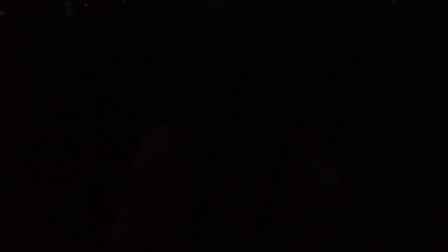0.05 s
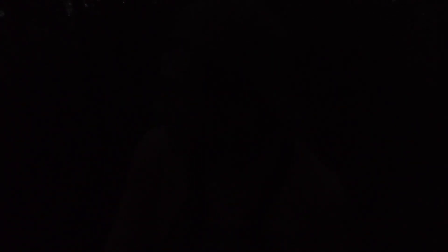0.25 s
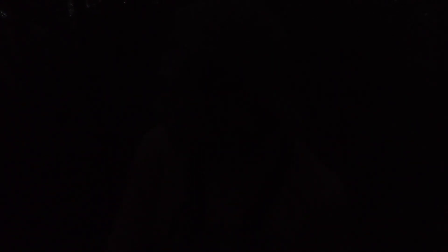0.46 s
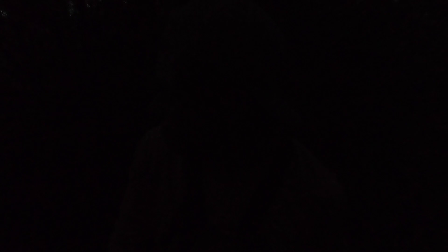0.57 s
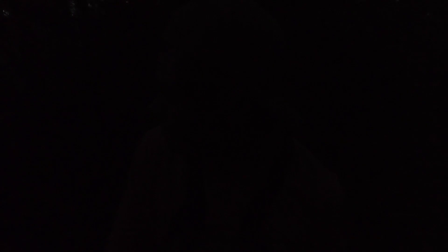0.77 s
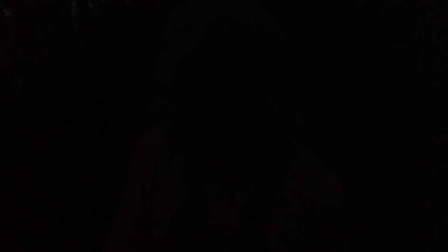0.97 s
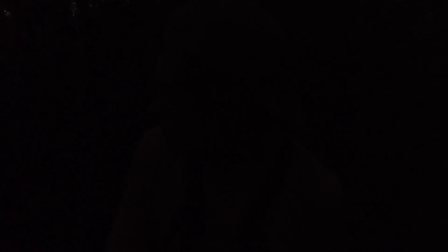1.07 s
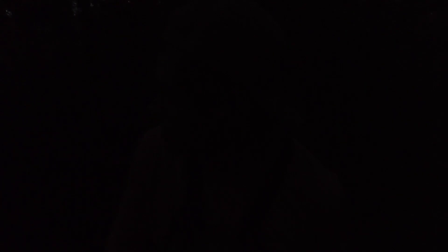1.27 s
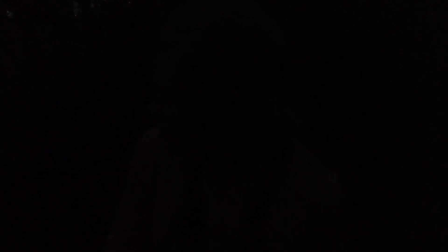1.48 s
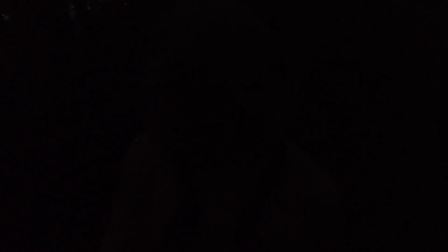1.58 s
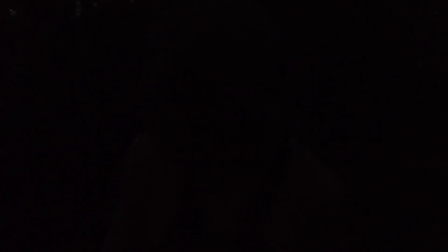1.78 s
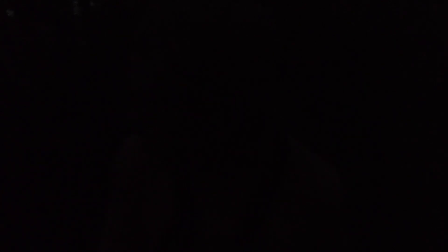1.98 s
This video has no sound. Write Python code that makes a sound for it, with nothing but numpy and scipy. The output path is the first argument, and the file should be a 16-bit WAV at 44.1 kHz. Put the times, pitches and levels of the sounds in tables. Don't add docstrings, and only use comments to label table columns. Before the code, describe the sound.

Night crickets: soft pulsing low chirps, a constant shimmering high chorus, faint rumble and small bumps

```python
import sys
import numpy as np
from scipy import signal
from scipy.fft import rfft, irfft, next_fast_len
from scipy.io import wavfile
from scipy.ndimage import uniform_filter1d

SR = 44100
rng = np.random.default_rng(int(sys.argv[2]) if len(sys.argv) > 2 else 0)


def elevation(decibels):
    levels = np.asarray(decibels, float)
    return 10 ** (levels / 20)


def log_audio(samples):
    frames = np.atleast_2d(samples).T
    limited = np.clip(frames, -1, 1)
    pcm = np.round(limited * 32767).astype(np.int16)
    wavfile.write(sys.argv[1], SR, pcm)


N = 89831

# (first stroke [s], level [dB], length [strokes])
NEAR_CHIRPS = [
    (.068, -44.5, 11.8),
    (.411, -42, 9.7),
    (.731, -43, 10.8),
    (1.055, -40, 9.8),
    (1.389, -41.5, 10.4),
    (1.737, -43, 12),
]
# (first stroke [s], level [dB], length [strokes], pitch [Hz])
NEIGHBOUR_CHIRPS = [(0.014, -44.5, 11.7, 1810), (.14, -48, 12, 1743), (.335, -44, 8.3, 1785),
                    (0.435, -46, 3.7, 1763), (0.507, -46.5, 8.4, 1818), (.63, -51.5, 7.7, 1799),
                    (.703, -44.5, 6.5, 1760), (0.86, -46.5, 8.7, 1822), (0.988, -51.5, 5.7, 1804),
                    (1.128, -44, 8.9, 1803), (1.241, -48.5, 11.2, 1836), (1.423, -45.5, 6.4, 1776),
                    (1.509, -42.5, 7.6, 1808), (1.603, -48.5, 7.6, 1821), (1.726, -49, 13.7, 1713),
                    (1.872, -43, 9.7, 1838), (1.958, -47.5, 5.2, 1770), (.123, -39, 1.5, 1832),
                    (.182, -42.5, 1.5, 1854), (.445, -43, 1.5, 1880), (0.7968, -42.5, 3.5, 1865),
                    (.788, -45, 1.5, 1862), (1.886, -45, 1.5, 1870), (1.09, -47.5, 2.5, 1888),
                    (1.179, -41, 1.9, 1835), (1.82, -44, 3.5, 1873), (1.934, -41, 1.5, 1856),
                    (1.483, -41, 1.9, 1855)]
# (pitch [Hz], level against main tone [dB], share of stroke [0-1], early [s])
WING_TONES = [
    (2896, -36, 0.8, .001),
    (1573, -15.5, 0.484, -.002),
    (3400, -38, 0.26, -0.0048),
]
# (pitch [Hz], level [dB], left lag [s], pitch arch in a stroke [share])
TRILL_VOICES = [
    (8215, -77.5, .000105, 0.027),
    (7790, -62, -0.0019, 0.018),
    (5275, -69, .00005, 0.0098),
    (5550, -75.5, .00002, .012),
    (7450, -75.5, -.00002, 0.017),
    (6210, -66.5, .00004, .02),
]
# (strokes per second [1/s], first stroke [s])
TRILL_PACE = [(51.7, .007), (48.7, .0115), (48.1, .017), (49.5, .01), (50.5, .004), (45.5, .012)]
# (time [s], swell [dB], length [s])
TRILL_SWELLS = [
    (1.4, 12, 0.81),
    (2.1, 6, 0.54),
    (0.65, 11.5, 0.14),
    (.42, 14.5, 0.099),
    (1.1, 7.5, .5),
    (.6, 2, .5),
]
# (frequency [Hz], level [dB])
CROWD_COLOUR = [(2880, -62), (4900, -24.5), (5210, -8), (6150, 2), (6670, -2), (7710, 1), (8120, 1),
                (8350, -0.5), (8570, -3.5), (11100, -45), (18900, -120)]
# (frequency [Hz], density [dB per Hz])
BLUR_COLOUR = [(4500, -46.5), (5200, -7), (6200, -3), (6700, -7.5), (7900, 0.5), (8050, -5), (8550, -16.5),
               (8800, -43)]
# (frequency [Hz], density [dB per Hz])
FAR_CHIRP_COLOUR = [(650, -68.5), (1100, -28), (1360, -19.5), (1830, -3), (1930, -5), (2130, -21),
                    (2350, -31.5), (4160, -40), (5000, -29), (6500, -59), (11000, -120)]
# (frequency [Hz], density [dB per Hz])
MIDDLE_COLOUR = [(2600, -25.5), (2880, 0), (3150, -27)]
# (frequency [Hz], density [dB per Hz])
SHRILL_COLOUR = [(11500, -40), (11850, -6), (12150, 0), (12450, -8), (12700, -30)]
# (frequency [Hz], density [dB per Hz])
RUMBLE_COLOUR = [(65, -51), (110, -17), (151, -5), (193, -1.5), (247, -7.5), (274, -13), (500, -28),
                 (650, -68), (1100, -120)]
# (frequency [Hz], density [dB per Hz])
DEEP_COLOUR = [(15, -18), (30, -1), (60, 3.5), (110, -6), (250, -43.5)]
# (frequency [Hz], density [dB per Hz])
HISS_COLOUR = [(150, -25.0), (400, -1), (850, -6.5), (1400, -9), (2500, -9.5), (4300, -27.5), (6000, -53.5)]
# (time [s], level [dB])
GUSTS = [
    (0.0, -60),
    (0.13, -55),
    (0.27, -61),
    (0.49, -59.5),
    (1.07, -59.5),
    (1.17, -58),
    (1.88, -60.5),
    (2.03, -58),
]
# (frequency [Hz], likeness [0-1])
LIKENESS = [(40, .94), (80, .86), (140, .6), (400, .55), (1000, .55), (1900, .9), (3500, .5), (6000, .2)]
# (frequency [Hz], left minus right [dB])
TILT = [(60, -1.5), (200, -3), (700, -2.5), (2380, 2.5), (5000, -1.5), (8120, -1.5)]
# (time [s], level [dB], pitch [Hz], length [s])
BUMPS = [(.0, -52, 359, 0.019), (.012, -50, 173, 0.044), (.127, -45, 225, .014), (.129, -51.5, 372, .009),
         (.0, -54.5, 42, 0.053), (.08, -56.5, 214.6, .07), (.25, -54.5, 159.4, .06),
         (.43, -58.5, 206, 0.041), (0.606, -59.5, 29.5, 0.038), (0.795, -52, 34.3, 0.083),
         (.93, -59.5, 198.7, 0.042), (0.976, -56, 33, .08), (1.04, -51, 182.3, 0.036),
         (1.128, -58, 84.2, .05), (1.22, -60.5, 198, 0.035), (1.38, -56.5, 170.4, 0.0394),
         (1.46, -58.5, 260, .04), (1.563, -52, 62, 0.03), (1.601, -58.5, 30.3, 0.086),
         (1.751, -58.5, 56.2, 0.044), (1.891, -54.5, 48, .085), (1.93, -54.5, 186.5, 0.041),
         (2.009, -44, 152, 0.028)]
# (time [s], level [dB], pitch [Hz], length [s])
SIDE_KNOCK = [
    (1.548, -47, 162, 0.0596),
    (1.536, -59, 410, 0.0303),
    (1.56, -62.5, 400, .03),
]
# (time [s], level [dB], decay to -60 dB [s])
RUSTLES = [
    (.0, -56, 0.26),
    (0.127, -56.5, 0.17),
    (1.451, -64.5, 0.13),
    (1.535, -70, 0.37),
    (1.719, -84.5, .08),
    (1.81, -70, 0.086),
    (0.859, -81, 0.052),
    (1.99, -69.5, 0.18),
]
# (frequency [Hz], density [dB per Hz])
LEAF_COLOUR = [(200, -15), (2800, 6.0), (5000, -7), (9000, -17.5), (12900, -18.5)]
# (time [s], peak [dB], pitch [Hz], decay to -60 dB [s])
TICKS = [(.001, -54, 2730, 0.048), (.01, -51, 2880, 0.026), (0.1265, -48, 2630, 0.019),
         (0.13, -43.5, 2560, 0.038), (0.132, -55.5, 4740, 0.027), (.1285, -59.5, 840, 0.017),
         (.129, -62, 570, 0.018), (.4035, -59, 4550, .007), (1.4514, -48.5, 4820, 0.011),
         (1.453, -58, 2580, .006), (1.453, -55, 3400, 0.0054)]

LOW_LAG_S = .00005


def rms_one(x):
    return x / np.sqrt(np.mean(x ** 2) + 1e-20)


def at_hz(points, hz):
    table_hz, value = np.array(points).T
    return np.interp(np.log(hz + 1), np.log(table_hz), value)


def drift(rate):
    pole = np.exp(-80 * np.pi * rate / SR)
    chance = rng.standard_normal(N // 40 + 2002)
    slow = signal.lfilter([1], [1, -2 * pole, pole * pole], chance)[2000:]
    return np.interp(np.arange(N) / 40, np.arange(len(slow)), rms_one(slow))


def noise(spectrum):
    size = next_fast_len(N)
    hz = np.arange(size // 2 + 1) * SR / size
    inside = (hz > spectrum[0][0]) * (hz < spectrum[-1][0])
    mid, side = rfft(rng.standard_normal((2, size))) * elevation(at_hz(spectrum, hz)) * inside
    alike = np.clip(at_hz(LIKENESS, hz), 0, 1)
    mid, side = np.sqrt(1 + alike) * mid, np.sqrt(1 - alike) * side
    tilt = elevation(at_hz(TILT, hz) / 2)
    left = (mid + side) * tilt * np.exp(-2j * np.pi * hz * LOW_LAG_S)
    right = (mid - side) / tilt
    return rms_one(irfft([left, right], size)[:, :N])


def add_stroke(out, centre_s, length_s, db, hz, bend, lag_s, phase):
    first = int((centre_s - length_s / 2 - abs(lag_s)) * SR)
    last = first + int((length_s + 2 * abs(lag_s)) * SR) + 2
    i = np.arange(max(first, 0), min(last, N))
    ear_lag = np.array([[lag_s], [0]])
    u = np.clip((i / SR - centre_s - ear_lag) / length_s + .5, 0, 1)
    turn = 2 * np.pi * hz * length_s * (u + bend(u)) + phase
    out[:, i] += elevation(db) * np.sin(np.pi * u ** 1.04) ** 1.33 * np.sin(turn)


def wind():
    gust_db = np.interp(np.arange(N) / SR, *np.transpose(GUSTS))
    gust_db = 0.82 * (gust_db - gust_db.mean())
    rumble = elevation(-59.5 + gust_db + 1.3 * drift(12)) * noise(RUMBLE_COLOUR)
    deep = elevation(-66.5 + gust_db + 2 * drift(8.7)) * noise(DEEP_COLOUR)
    return rumble + deep + elevation(-72) * noise(HISS_COLOUR)


def far_chirpers(low):
    beat = rms_one(np.sqrt(uniform_filter1d(low[0] ** 2, size=3000, origin=1200) + 1e-7))
    return elevation(-59) * beat ** 0.21 * noise(FAR_CHIRP_COLOUR)


def middle_singers():
    return elevation(-85 + 2.5 * drift(60)) * noise(MIDDLE_COLOUR)


def shrill_buzz():
    return elevation(-94.5 + 0.8 * drift(3.3)) * noise(SHRILL_COLOUR)


def trill_blur():
    return elevation(-58.5) * noise(BLUR_COLOUR)


def bumps_from(rows, pan_db, lag_s):
    out = np.zeros((2, N))
    for (s, db, hz, length_s), luck in zip(rows, rng.random((len(rows), 3))):
        # (pitch ratio, level [dB], delay in lengths)
        parts = [(1.008, 0, 0.497), (1.24, -6, luck[0]), (0.817, -6.5, luck[1])]
        for ratio, part_db, late in parts:
            add_stroke(out, s + length_s * late, 1.4 * length_s / ratio, db + part_db, hz * ratio,
                       lambda u: .04 * (u - u * u), lag_s, 6 * luck[2])
    return out * elevation([[pan_db / 2], [-pan_db / 2]])


def bumps():
    ahead = bumps_from(BUMPS, pan_db=-1, lag_s=.0001)
    return ahead + bumps_from(SIDE_KNOCK, pan_db=-12, lag_s=.0011)


def rustle():
    t = np.arange(N) / SR
    dying = sum(elevation(db - 60 * np.clip((t - s) / t60, 0, 3)) * (t >= s) for s, db, t60 in RUSTLES)
    return dying * elevation(2.0 * drift(90)) * noise(LEAF_COLOUR)


def ticks():
    out, t = np.zeros((2, N)), np.arange(N) / SR
    for s, db, hz, t60 in TICKS:
        age = np.maximum(t - s, 0)
        dying = elevation(db - 60 * np.minimum(age / t60, 3)) * (age < 2 * t60)
        out += dying * np.minimum(age / 0.00088, 1) * np.sin(2 * np.pi * hz * age)
    return out


def trill(rate, first_s, hz, db, lag_s, arch, wander_db):
    out, level = np.zeros((2, N)), wander_db * drift(0.94)
    for k, luck in enumerate(rng.standard_normal((120, 3))):
        s = first_s + k / rate + .0005 * luck[0]
        if s < N / SR:
            stroke_db = db + level[int(max(s, 0) * SR)] + 0.79 * luck[1]
            add_stroke(out, s, .65 / rate, stroke_db, hz,
                       lambda u: arch * (1 - np.cos(np.pi * u)) / np.pi, lag_s, 9 * luck[2])
    return out


def clear_trills():
    out, t = np.zeros((2, N)), np.arange(N) / SR
    for pace, voice, (s, swell_db, length_s) in zip(TRILL_PACE, TRILL_VOICES, TRILL_SWELLS):
        swell = elevation(swell_db * np.exp(-((t - s) / length_s) ** 2))
        out += trill(*pace, *voice, wander_db=1.9) * swell
    return out


def trill_crowd():
    out = np.zeros((2, N))
    for hz, (pace, start, lag, pan) in zip(np.linspace(5150, 7550, num=22), rng.random((22, 4))):
        voice = trill(26 + 26 * pace, .03 * start, hz, at_hz(CROWD_COLOUR, hz), 0.00019 * (lag - .5),
                      arch=0.027, wander_db=1.0)
        out += voice * elevation([[2 * pan - 2], [-2 * pan]])
    return elevation(-60.5) * rms_one(out)


def low_crickets():
    out = np.zeros((2, N))
    near_hz, overtone_db = 1879.4, -32
    rows = [(*row, near_hz, 1) for row in NEAR_CHIRPS] + [(*row, 0) for row in NEIGHBOUR_CHIRPS]
    for (s, db, strokes, hz, near), luck in zip(rows, rng.standard_normal((len(rows), 14, 8))):
        for k in range(int(strokes)):
            swell_db = 1.5 * (np.sin(np.pi * (k + 3) / (strokes + 3)) - 1) + 1.5 * luck[k, 0]
            at = s + 0.002075 + .0105 * k + .0002 * k * k + 0.000403 * luck[k, 1]
            sag = 0.053 * (1 + .6 * luck[k, 1])
            overtones = [(2 * hz, overtone_db - swell_db, .95, .0005), (3350, overtone_db - 0.5, .25, .003)]
            tones = [(hz, 0, 1, 0)] + WING_TONES + overtones * near
            for (tone_hz, tone_db, share, early_s), chance in zip(tones, luck[k, 2:]):
                scattered_hz = tone_hz * (1 + .01 * chance)
                add_stroke(out, at - early_s, .0104 * share, db + swell_db + tone_db, scattered_hz,
                           lambda u: sag * (u - u * u) / 2, LOW_LAG_S, 9 * chance)
    return out


def woods(song):
    t = np.arange(SR // 2) / SR
    t60_s, onset_s = .3, 0.0076
    tail = rng.standard_normal((2, len(t))) * elevation(-60 * t / t60_s) * np.minimum(t / onset_s, 1)
    return elevation(-13) * signal.fftconvolve(song, tail / np.linalg.norm(tail[0]), axes=1)[:, :N]


def scene():
    low = low_crickets()
    song = low + clear_trills() + trill_crowd()
    floor = wind() + far_chirpers(low) + middle_singers() + shrill_buzz() + trill_blur()
    return song + woods(song) + floor + bumps() + rustle() + ticks()


def top_cut(x):
    return signal.sosfilt(signal.butter(12, 12680, fs=SR, output="sos"), x)


def record(dry):
    return top_cut(dry)


dry = scene()
out = record(dry)
log_audio(out)
```